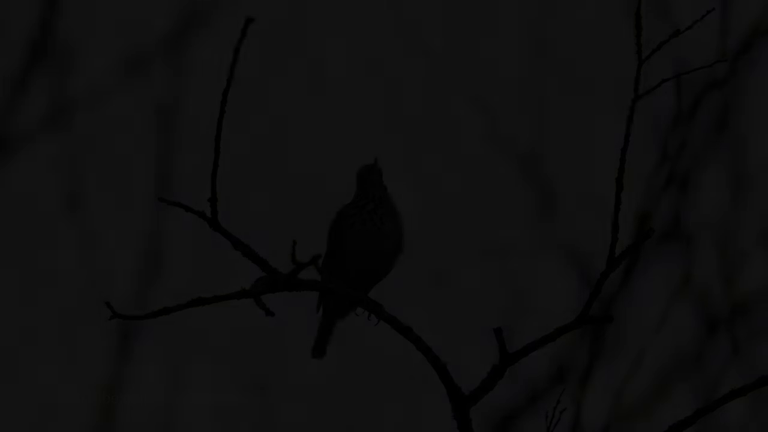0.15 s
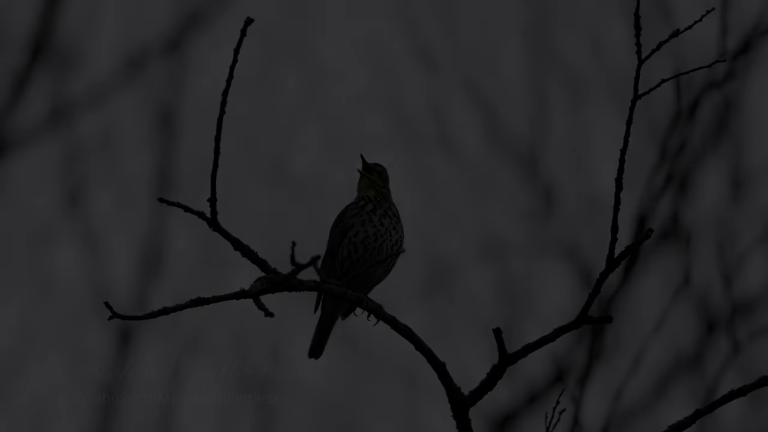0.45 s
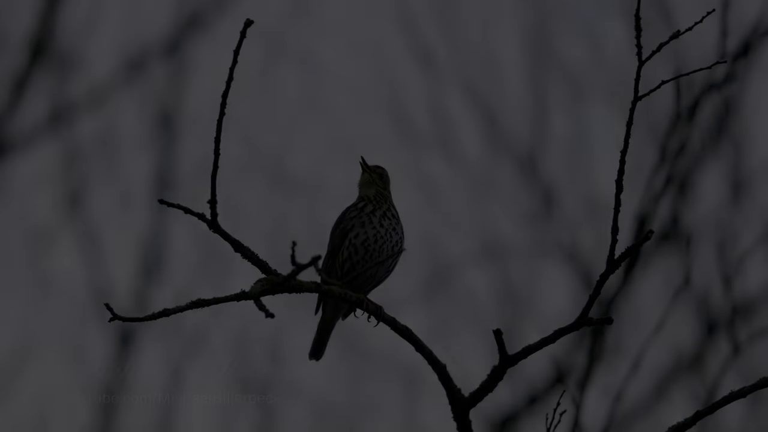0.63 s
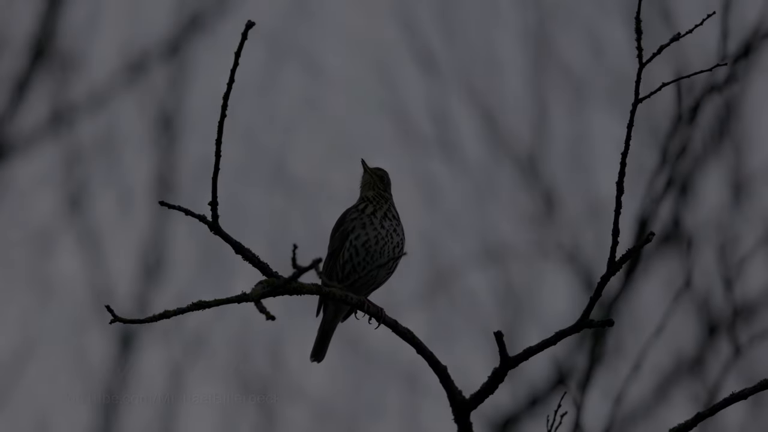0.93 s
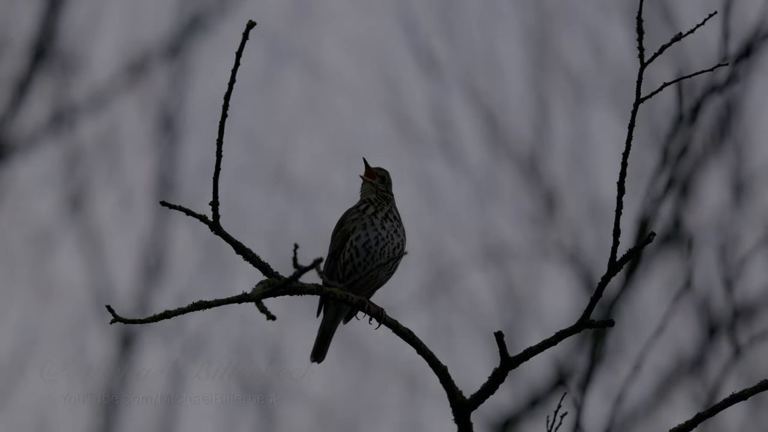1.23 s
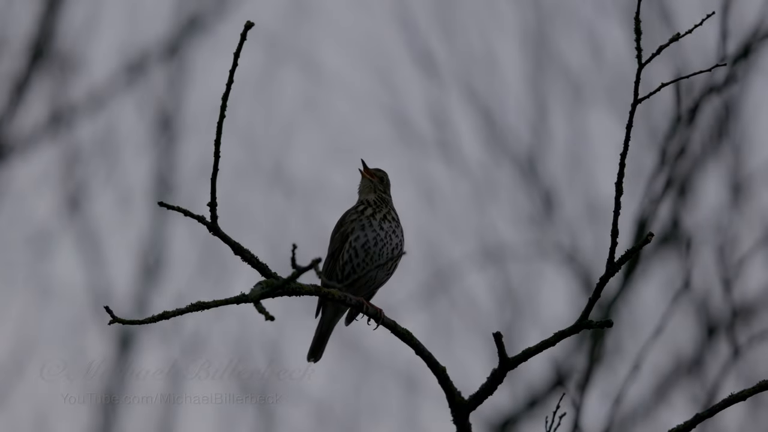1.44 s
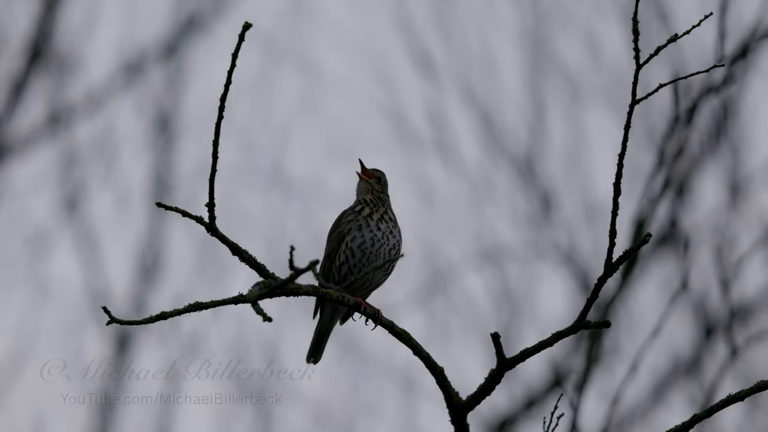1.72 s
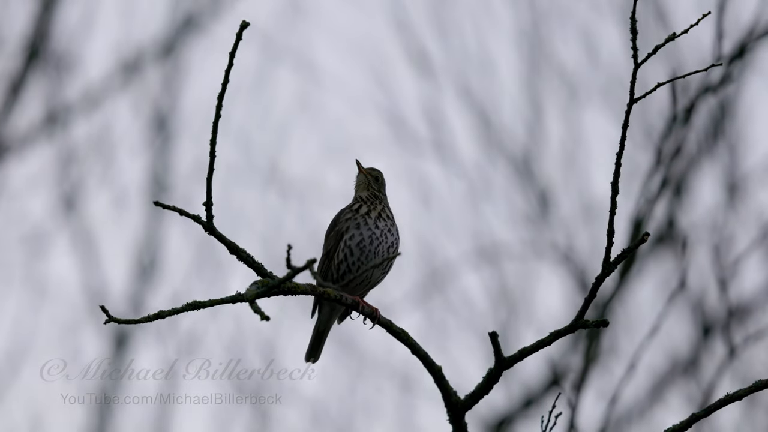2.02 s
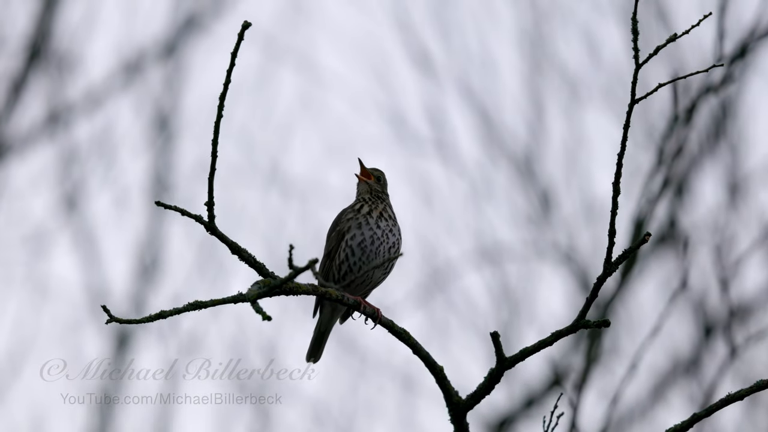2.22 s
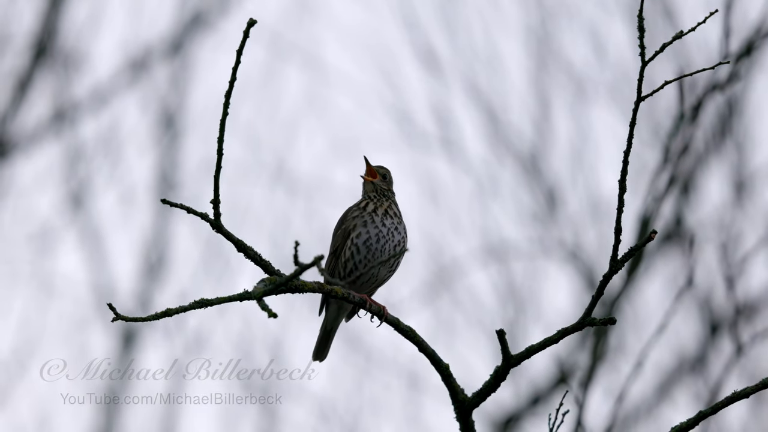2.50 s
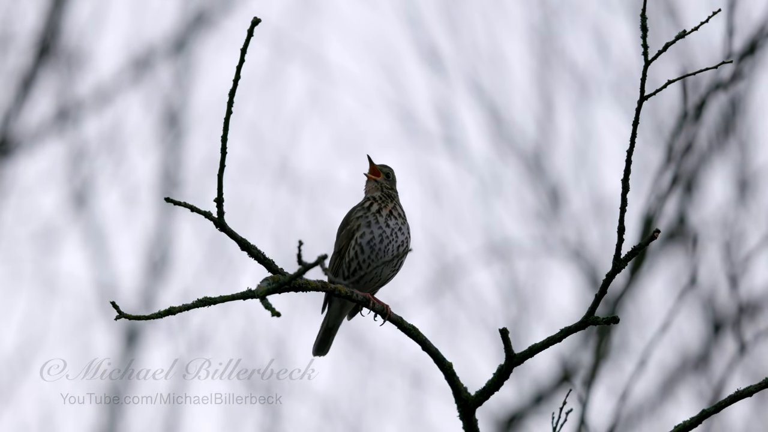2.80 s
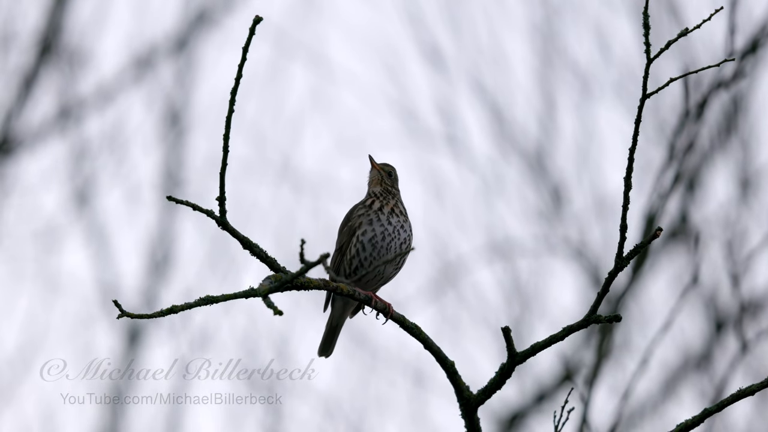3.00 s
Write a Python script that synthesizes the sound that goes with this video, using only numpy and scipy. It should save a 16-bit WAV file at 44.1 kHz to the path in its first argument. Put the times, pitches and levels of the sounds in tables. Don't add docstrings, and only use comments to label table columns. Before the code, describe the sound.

A thrush sings three groups of short arched, trilled notes, faint then loud, then a rapid high twitter, steep sweeps and a rising slide; woodland echo, soft hiss and distant traffic, fairly close nearly mono microphone.

```python
import sys
import numpy as np
from scipy import signal
from scipy.io import wavfile
from scipy.ndimage import uniform_filter1d

SR = 44100
rng = np.random.default_rng(int(sys.argv[2]) if len(sys.argv) > 2 else 0)


def boost(x):
    u = np.asarray(x, float) / 20
    return 10 ** u


def wav_record(signal):
    frames = np.transpose(np.atleast_2d(signal))
    bounded = np.clip(frames, -1, 1)
    quanta = np.round(bounded * 32767).astype(np.int16)
    wavfile.write(sys.argv[1], SR, quanta)


N = 138915

# time_s, pitch_hz, level_db
ARCHES_EARLY = [
    [(.319, 2200, -48), (.325, 2380, -53), (.3443, 2700, -33.5), (.371, 2553, -33.5), (.381, 2200, -63)],
    [(.497, 2400, -42), (.502, 2491, -38.5), (.535, 3020, -24), (.5637, 2810, -29), (.5768, 2193, -65)],
    [(.625, 2340, -43), (.6381, 2734, -28), (.6658, 2917, -22), (.692, 2750, -25), (.705, 2150, -61)],
    [(1.112, 2294, -41.5), (1.125, 2529, -31), (1.149, 2650, -20.5), (1.16, 2900, -13), (1.175, 2550, -34)],
]
ARCHES_LATE = [
    [(1.32, 2285, -39), (1.343, 2760, -20.5), (1.3642, 2836, -11.5), (1.3801, 2556, -19),
     (1.388, 2120, -37)],
    [(1.451, 2286, -58), (1.462, 2390, -27.5), (1.482, 2874, -19.5), (1.5149, 2795, -14),
     (1.5316, 2180, -41)],
    [(1.689, 1964, -33), (1.7029, 2240, -30.5), (1.7351, 2788, -13), (1.7519, 2650, -14.5),
     (1.764, 2184, -32)],
    [(1.83, 2340, -27), (1.848, 2725, -19), (1.8736, 2790, -12.5), (1.8863, 2580, -16), (1.898, 2050, -42)],
]


def evened(x):
    return x / np.sqrt(np.mean(x ** 2) + 1e-20)


def read(points, hz):
    f, value = np.transpose(points)
    return np.interp(np.log(hz + 1), np.log(f + 1), value)


def soften(x, s):
    n = max(int(s * SR), 1)
    return uniform_filter1d(uniform_filter1d(x, n), n)


def noise(spectrum, patchy_db):
    hz = np.fft.rfftfreq(1024, 1 / SR)
    real, imag, patches = rng.standard_normal((N // 256 + 5, 513, 3)).T
    patches = evened(uniform_filter1d(uniform_filter1d(patches, 10, axis=0), 12, axis=1))
    outside = (hz < spectrum[0][0]) | (hz > spectrum[-1][0])
    shape_db = np.where(outside, -25, 0) + read(spectrum, hz)
    z = (real + 1j * imag) * boost(shape_db[:, None] + patchy_db * patches)
    return evened(signal.istft(z, nperseg=1024, noverlap=768)[1][:N])


def thrush():
    # time_s, pitch_hz, level_db
    twitter_notes = [
        [(2.2655, 3500, -42), (2.268, 4410, -19), (2.2725, 5950, -24), (2.279, 6500, -20), (2.286, 6550, -16),
         (2.31, 6530, -16.5), (2.3172, 5550, -24)],
        [(2.3172, 5560, -13), (2.3238, 6415, -19), (2.3275, 5776, -15), (2.3303, 4600, -13),
         (2.333, 4954, -19.5), (2.336, 5350, -25.5), (2.341, 5200, -28)],
        [(2.381, 4800, -38), (2.3865, 3383, -29), (2.3905, 4530, -17.5), (2.393, 5920, -22),
         (2.3965, 6610, -14), (2.4055, 7056, -17.5), (2.409, 6680, -12), (2.4137, 5940, -16)],
        [(2.4137, 5900, -33), (2.418, 6586, -10.5), (2.4215, 6810, -15.5), (2.428, 5830, -10.5),
         (2.432, 6710, -16), (2.436, 6710, -7), (2.4385, 6300, -12.5), (2.443, 5070, -11.5)],
        [(2.443, 5210, -18), (2.447, 6184, -11.5), (2.4505, 6510, -12), (2.4555, 4930, -11.5),
         (2.4585, 4430, -17), (2.464, 5060, -14), (2.468, 4420, -25), (2.473, 4000, -38)],
    ]
    # time_s, pitch_hz, level_db
    sweep_notes = [
        [(2.529, 3180, -36), (2.5362, 3609, -23.5), (2.543, 5783, -11.5), (2.5462, 5850, -10),
         (2.551, 4340, -12.5), (2.554, 3500, -40.5)],
        [(2.555, 2450, -30), (2.56, 2430, -29.5), (2.5645, 2400, -32)],
        [(2.566, 3140, -29), (2.5732, 2573, -26.5), (2.5785, 3760, -24.5), (2.5835, 5080, -11),
         (2.5896, 6368, -14), (2.595, 6580, -7), (2.5995, 6350, -11), (2.6032, 5180, -12), (2.608, 3900, -48)],
        [(2.61, 2450, -33), (2.6135, 2390, -28.5), (2.6165, 2400, -40)],
        [(2.617, 2715, -27), (2.622, 2870, -33.5), (2.6333, 6020, -12), (2.6378, 6735, -11.5),
         (2.6487, 7590, -13.5), (2.6583, 6529, -11), (2.6641, 4010, -30), (2.6737, 2840, -29)],
        [(2.674, 2855, -46), (2.6862, 5645, -13.5), (2.688, 6532, -12.5), (2.7044, 8290, -18),
         (2.7103, 7834, -20.5), (2.7148, 6600, -11), (2.7171, 5580, -17), (2.7239, 3704, -44.5)],
    ]
    # time_s, pitch_hz, level_db
    slide_note = [(2.789, 3220, -48), (2.8074, 3093, -8.5), (2.8373, 2989, -11), (2.882, 3325, -10),
                  (2.9, 4447, -9.5), (2.9144, 4484, -21), (2.9258, 4415, -43)]
    # time_s, pitch_hz, level_db
    partner_notes = [
        [(2.266, 4590, -28), (2.272, 7600, -26), (2.279, 7840, -28), (2.309, 8100, -25), (2.317, 6820, -30),
         (2.3245, 8580, -22.5), (2.329, 6680, -43)],
        [(2.865, 4750, -43), (2.895, 5200, -41), (2.92, 5040, -41)],
    ]
    # freq_hz, gain_db
    beak = [(8000, -2.5), (9700, -5), (12500, 0.5), (16000, -12.5), (24000, -55)]
    second_b_db, upper_db = -29.5, -33
    sum_db, diff_db = -17, -23
    rasp_db, hiss_db = -21, -40

    twitter_tone = dict(second_db=-15, third_db=-24, fall_db=0)
    sweep_tone = dict(second_db=-17, third_db=-19, fall_db=0)
    slide_tone = dict(second_db=-29, third_db=-34, fall_db=0)
    notes = ARCHES_EARLY + ARCHES_LATE + twitter_notes + sweep_notes + [slide_note]
    tones = arch_tones() + [twitter_tone] * len(twitter_notes) + [sweep_tone] * len(sweep_notes) + [slide_tone]
    hz, level, partial = tracks(notes, tones)
    high_hz, high_level, shake_db, shake_hz = trills()
    pair_hz, pair_level, _ = tracks(partner_notes, [twitter_tone] * 2)
    paired = pair_level > 1e-4
    b_hz = np.where(paired, pair_hz, high_hz)

    a, level_a = membrane(hz + shake_hz, level * boost(shake_db))
    b, level_b = membrane(b_hz, high_level + pair_level)
    beak_db = np.array([read(beak, 2 * hz), read(beak, 3 * hz)])
    second, third = partial * boost(0.37 * shake_db + beak_db)
    low_side = level_a * (a + second * a ** 2 + third * a ** 3)
    high_side = level_b * (b + boost(second_b_db + read(beak, 2 * b_hz)) * b ** 2)

    mixing = boost(sum_db) * a * b
    mixing = mixing + boost(upper_db) * a * a * b * ~paired
    mixing = mixing + boost(diff_db) * (a * a / b + b * b / a) * paired
    mixing = level_b * mixing * (level_a > level_b / 20)

    rasp = noise([(3300, 0), (5500, -2), (9000, -11), (12500, -24), (15500, -34)], patchy_db=1.)
    rasp_level = boost(rasp_db) * np.sqrt(abs(level_a * level_b)) * ~paired
    return (low_side + high_side + mixing).real + (rasp_level + boost(hiss_db) * level_a) * rasp


def membrane(hz, level):
    jitter_hz = 22
    hz = hz + jitter_hz * evened(soften(rng.standard_normal(N), 0.00043))
    return np.exp(2j * np.pi * np.cumsum(hz) / SR), np.sqrt(2) * level


def tracks(notes, tones):
    bow, round_s = 1.3, .0013
    t, level, partial = np.arange(N) / SR, np.zeros(N), np.zeros((2, N))
    for note, tone in zip(notes, tones):
        s, _, db = np.transpose(note)
        on = (t >= s[0]) & (t <= s[-1] + 1 / SR)
        level[on] = np.interp(t[on], s, boost(db / 2)) ** 2
        partials_db = np.array([tone["second_db"], tone["third_db"]])
        partial[:, t >= s[0] - .004] = boost(partials_db)[:, None]
        partial[:, on] *= boost(tone["fall_db"] * (t[on] - s[0]) / (s[-1] - s[0]))
    rows = np.concatenate(notes)
    hz = np.interp(t, rows[:, 0], rows[:, 1] ** bow) ** (1 / bow)
    return soften(hz, round_s), soften(level, round_s / 2), partial


def arch_tones():
    reedy = dict(second_db=0, third_db=-11, flutter_db=6, flutter_hz=95, fall_db=-24, swing=.7, swing_left=.3)
    broken = dict(second_db=-14, third_db=-24, flutter_db=6, flutter_hz=98, fall_db=-16, swing=.6, swing_left=.15)
    clear = dict(second_db=-20, third_db=-30, flutter_db=2, flutter_hz=50, fall_db=-10, swing=1., swing_left=.55)
    return [reedy, broken, clear, reedy, clear, clear, clear, clear]


def trills():
    # first_dip_s, period_s, dip_pitch_hz, peak_db
    dips = [
        (0.3145, .0099, 4100, -58),
        (0.4935, .0081, 3950, -27),
        (0.6242, 0.0059, 3850, -26.5),
        (1.1075, 0.0089, 3900, -30),
        (1.3227, .0065, 3950, -14),
        (1.451, 0.00537, 4000, -12),
        (1.686, 0.0055, 3750, -14),
        (1.824, 0.0056, 3900, -10),
    ]
    start_db, end_db, peak_at = -15, -19, 0.25
    swing_hz, top_drop_db, sag = 1700, -10, 0.049
    t, hz = np.arange(N) / SR, np.full(N, 4000.)
    level, shake_db, shake_hz = np.zeros((3, N))
    for (s, period, dip_hz, db), tone, arch in zip(dips, arch_tones(), ARCHES_EARLY + ARCHES_LATE):
        length = arch[-1][0] - s
        on = (t > s - period / 2) & (t < s + length)
        u = np.clip((t[on] - s) / length, 0, 1)
        up = .5 - .5 * np.cos(2 * np.pi * (t[on] - s) / period)
        left = tone["swing_left"]
        swing = left + (1 - left) * (1 - u) ** 3
        shake = (1 - u) ** 1.8 * (1 - 2 * up)
        hz[on] = dip_hz * (1 + sag * (.5 - u)) + swing_hz * tone["swing"] * swing * up ** 1.4
        arc_db = np.interp(u, [0, peak_at, 1], [start_db, 0, end_db])
        level[on] = boost(db + arc_db + top_drop_db * swing * up / tone["swing"])
        shake_db[on] = tone["flutter_db"] * shake
        shake_hz[on] = tone["flutter_hz"] * shake
    return hz, soften(level, 0.00023), shake_db, shake_hz


def trees(x, t60, delay_s):
    tilt_db = 1
    taps = np.zeros(SR)
    first = np.arange(int(delay_s * SR), SR - 20, 20)
    taps[first + rng.integers(0, 20, len(first))] = rng.choice([-1., 1.], len(first))
    hz, t, z = signal.stft(taps, SR, nperseg=256)
    octaves = np.log2(hz[:, None] / 3000 + 0.12)
    decay_db = 60 * t / t60 * (2.0 + 0.2 * np.maximum(octaves, 0))
    tail = signal.istft(z * boost(tilt_db * octaves - decay_db), SR, nperseg=256)[1]
    return signal.fftconvolve(x, tail / np.linalg.norm(tail))[:N]


def far_birds():
    # start_s, length_s, from_hz, to_hz, level_db
    calls = [(0.19, 0.054, 3040, 3170, -63.5), (.278, 0.06, 3140, 3300, -57),
             (1.965, 0.05, 5730, 6040, -51), (.81, 0.028, 3160, 3130, -46),
             (0.889, 0.042, 2560, 2250, -51.5), (1.007, 0.029, 5800, 4300, -68),
             (2.095, 0.023, 2240, 2650, -38.5), (2.192, 0.021, 2930, 3130, -36),
             (2.23, 0.044, 2880, 2960, -39), (2.25, 0.017, 4680, 2850, -36.5),
             (2.99, 0.013, 2150, 2550, -61), (2.99, 0.13, 6900, 6580, -64)]
    tick_s, tick_db, tick_decay_s = 1.783, -35.5, 0.0017
    out = np.zeros(N)
    for s, length, from_hz, to_hz, db in calls:
        u = np.arange(int(length * SR)) / (length * SR)
        i = int(s * SR)
        whistle = np.sin(2 * np.pi * np.cumsum(from_hz + (to_hz - from_hz) * u) / SR)
        out[i:i + len(u)] += boost(db) * np.sin(np.pi * u) ** 0.42 * whistle
    i, t = int(tick_s * SR), np.arange(200) / SR
    out[i:i + 200] += boost(tick_db) * np.diff(rng.standard_normal(201)) * np.exp(-t / tick_decay_s)
    return out


def traffic():
    # freq_hz, density_db
    spectrum = [(42, -25.5), (62, -8.5), (220, -3.5), (700, -6), (1200, -10.5), (1900, -24.5),
                (2600, -27.5)]
    # time_s, level_db
    swell = [(.03, -84), (.15, -57.5), (.45, -44), (.8, -43.5), (1.1, -35.5), (1.9, -30), (2.4, -24),
             (2.8, -27.5), (2.95, -32.5)]
    level_db = np.interp(np.arange(N) / SR, *np.transpose(swell))
    return boost(level_db) * noise(spectrum, patchy_db=1.)


def air():
    # freq_hz, density_db
    spectrum = [(1500, -39), (3000, 5), (4000, -14), (6000, -23.5), (9000, -23), (16000, -24.5)]
    return boost(-44.5) * noise(spectrum, patchy_db=4.5)


def scene():
    echo_db, late_db, capsule_db = -21, -16, -61
    fade_s, fade_power = 1.8, 1.5
    bird, far = thrush(), far_birds()
    source = bird + 4 * far
    mid = bird + far
    mid = mid + boost(echo_db) * trees(source, t60=0.15, delay_s=0.0045)
    mid = mid + boost(late_db) * trees(source, t60=0.75, delay_s=.03)
    fade = np.minimum(np.arange(N) / SR / fade_s, 1) ** fade_power
    mid = mid + traffic() + fade * air()
    return mid + boost(capsule_db) * fade * rng.standard_normal((2, N))


def roll_off(x):
    return signal.sosfilt(signal.butter(12, 16000, fs=SR, output="sos"), x)


def record(dry):
    edge = signal.firwin(511, 15850, window=("kaiser", 9), fs=SR)[None]
    cut = signal.lfilter(*signal.butter(3, 45, "high", fs=SR), dry)
    return roll_off(signal.oaconvolve(cut, edge, "same"))


dry = scene()
out = record(dry)
wav_record(out)
```